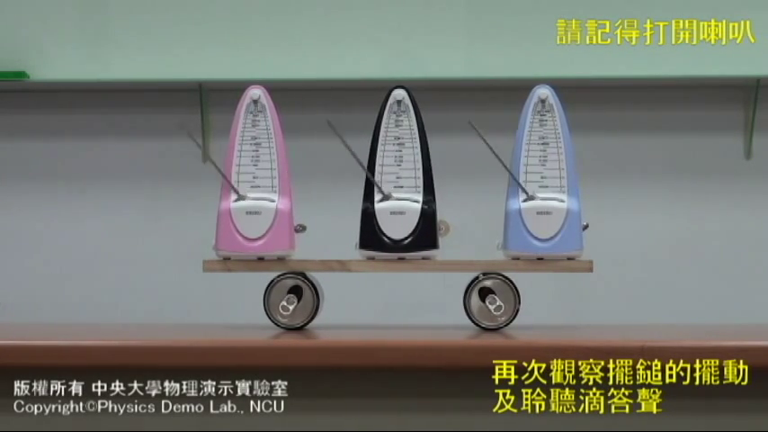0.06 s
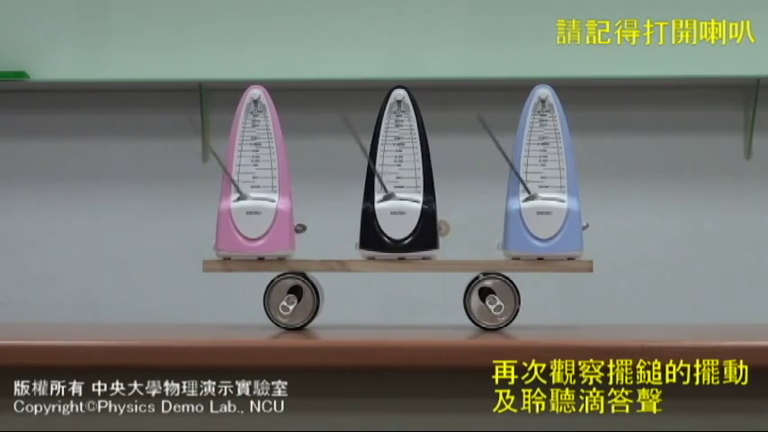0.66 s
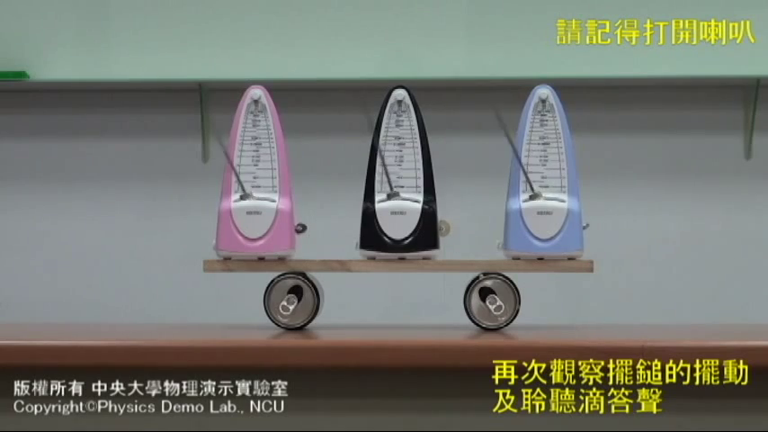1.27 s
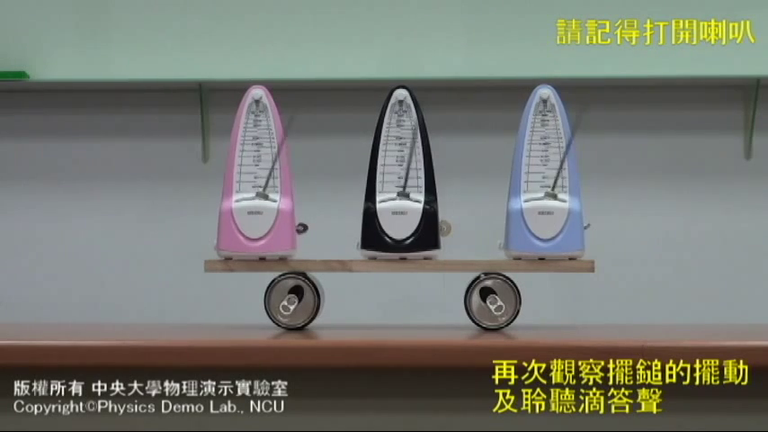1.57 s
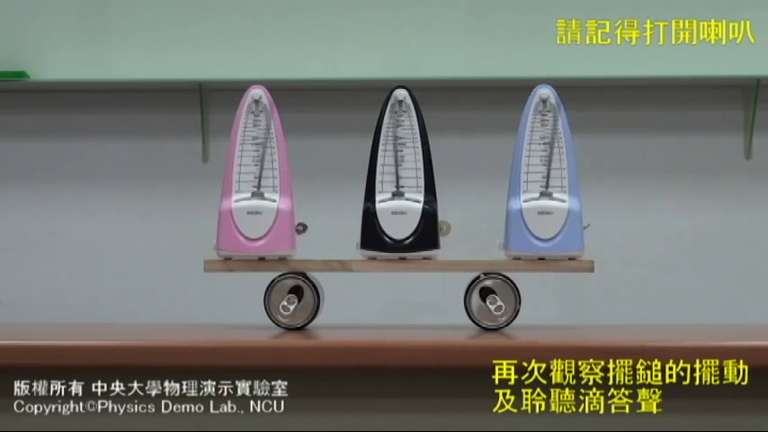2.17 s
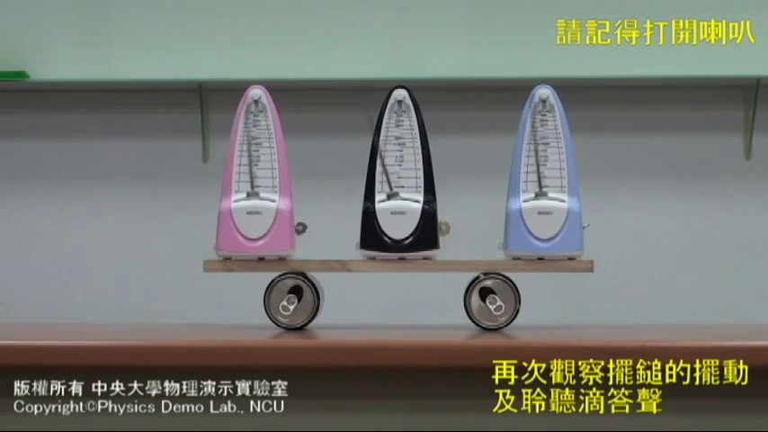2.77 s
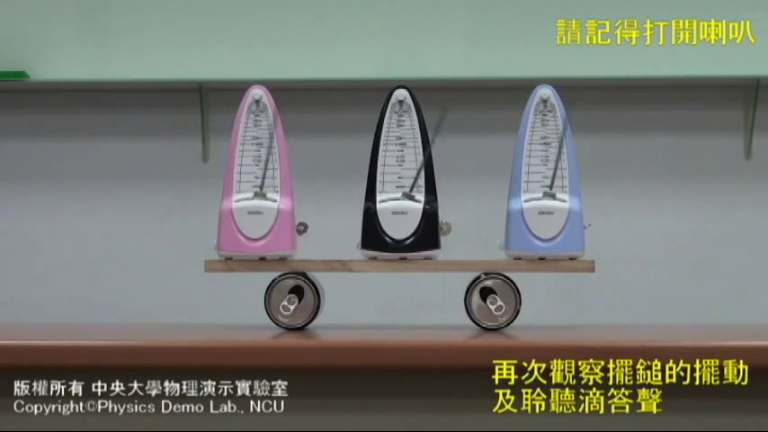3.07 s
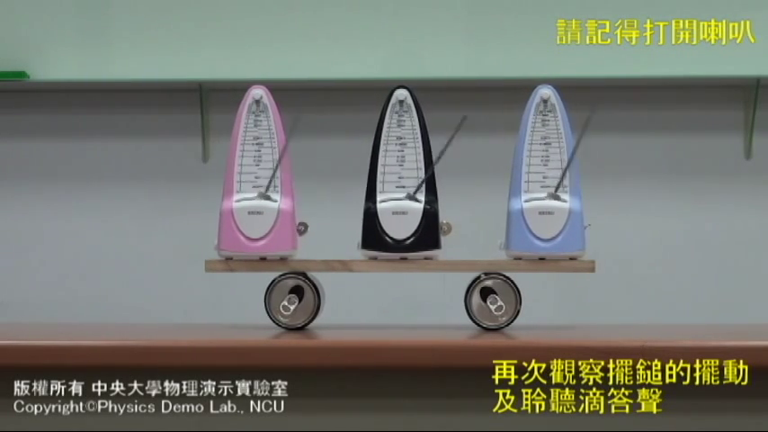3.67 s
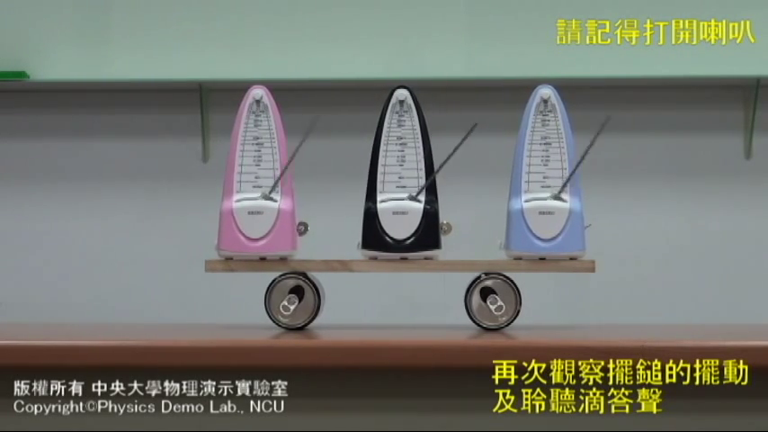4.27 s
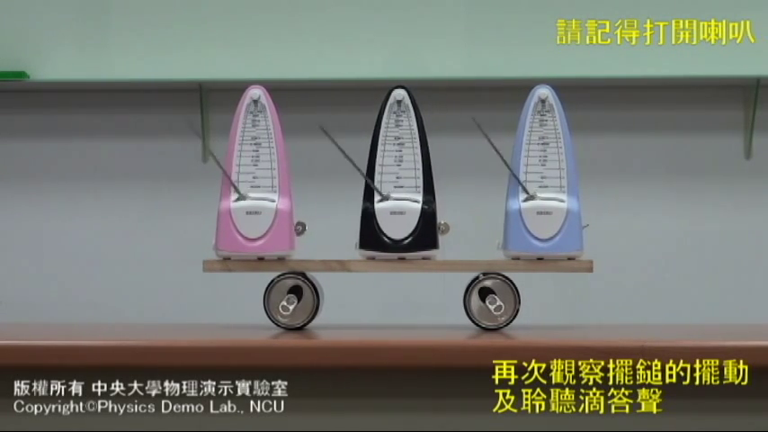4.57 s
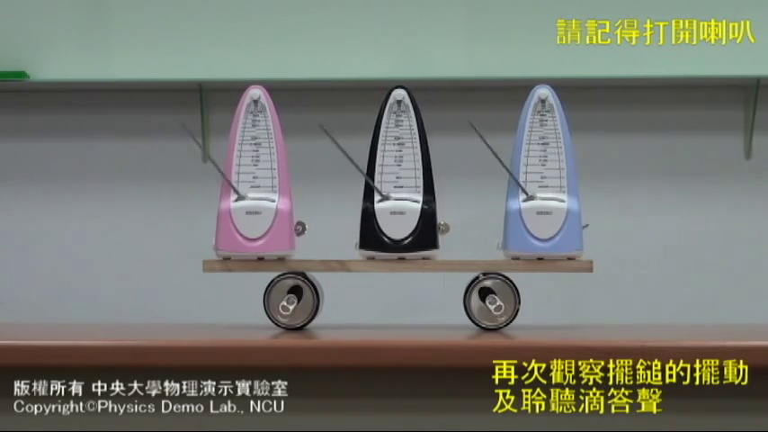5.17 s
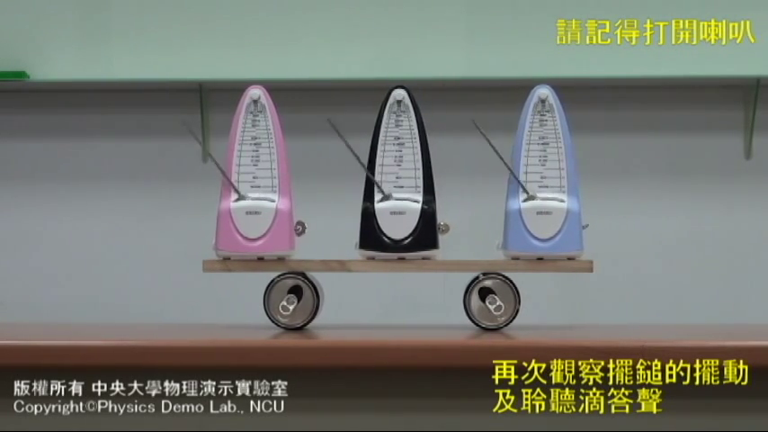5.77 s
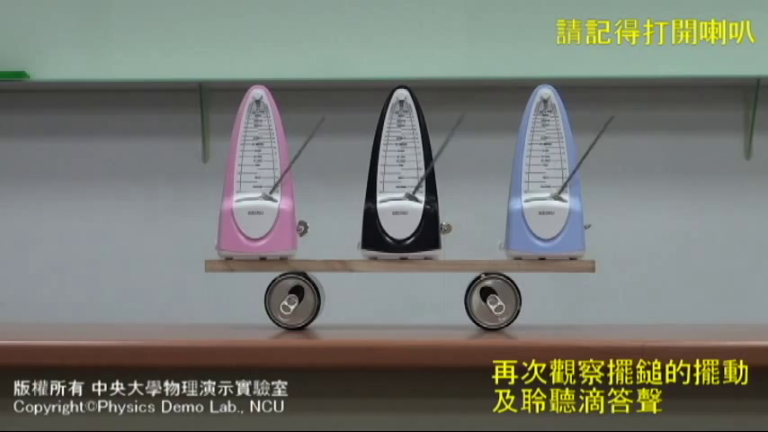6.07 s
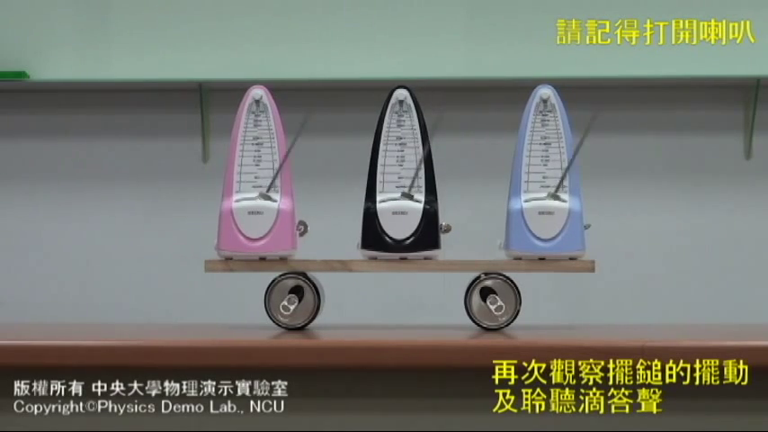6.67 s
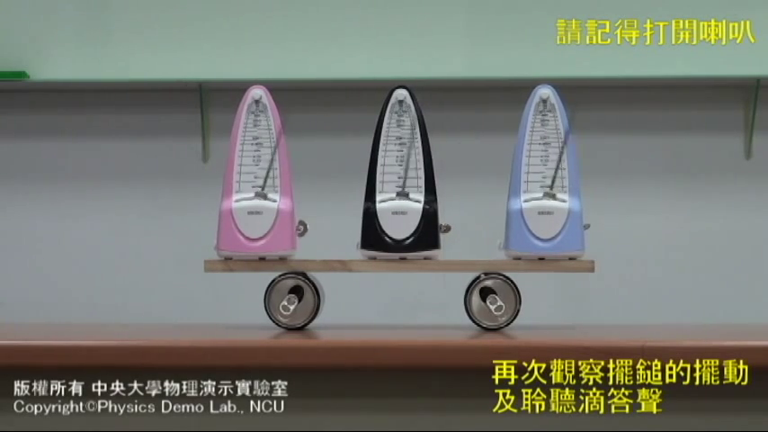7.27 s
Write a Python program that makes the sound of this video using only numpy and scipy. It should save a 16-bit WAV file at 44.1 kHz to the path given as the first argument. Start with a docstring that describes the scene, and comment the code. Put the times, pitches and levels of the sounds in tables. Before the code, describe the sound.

In a room with a quiet ventilation hum, three mechanical metronomes click away almost in step from start to finish, at roughly 210 beats a minute. Each has a slightly different plastic tone, and their ticks fall so close together that they make one crisp, thickened clack. They are heard from nearby, a little stronger on the right, with a short reverberation after each beat.

```python
"""Three metronomes on a rolling board

Three wind-up plastic metronomes tick almost in step, about 210 times a minute; one leads and two
follow some 20-30 ms later. Each escapement blow is an impact that cracks and rings its own case.
Nearby surfaces reflect the ticks, which die away in a room with a low ventilation rumble."""
import sys
import numpy as np
from scipy import signal
from scipy.fft import rfft, irfft, next_fast_len
from scipy.io import wavfile
from scipy.ndimage import uniform_filter1d

SR = 44100
rng = np.random.default_rng(int(sys.argv[2]) if len(sys.argv) > 2 else 0)


def unload_wav(signal):
    """Save mono or channel-first audio to the path in sys.argv[1] as 16-bit WAV at rate SR, clipped to [-1, 1]."""
    wavfile.write(
        sys.argv[1],
        SR,
        np.round(np.clip(np.atleast_2d(signal).T, -1, 1) * 32767).astype(np.int16),
    )


N = 322371

# Spectrum of the ventilation rumble and hiss: frequency_hz, density_db_per_hz
AIR_SPECTRUM = [(20, -80), (62, -82), (85, -75.5), (110, -66), (133, -75.5), (155, -69), (195, -67.5),
                (310, -74.5), (500, -74), (1000, -83), (4000, -86.5), (15000, -99)]
# Pendulums, one row a metronome: start_s, beat_s, lengthening_per_swing_s
PENDULUM_TIMING = [(.0202, .284205, .0000486), (.0381, .285779, -.0000378), (.0470, .284841, 0)]
# Normal modes of each case: pitch_hz, relative_peak_db, t60_s
CASE_MODES_1 = [(420, 4, 0.082), (856, 13, 0.041), (1255, 18.5, 0.022), (1661, 28.5, 0.037),
                (2075, 29, 0.033), (2893, 22.5, 0.023), (4338, 22.5, 0.037), (4856, 22.5, 0.04),
                (5000, 23, 0.044), (5300, 22, 0.053), (5544, 23.5, 0.035), (5645, 23.5, 0.054),
                (6050, 22, 0.047), (6670, 18.5, 0.046), (6770, 21.8, 0.076), (7120, 14.5, 0.056),
                (7900, 6, 0.077), (8100, 9, 0.045), (8780, 26.5, 0.038), (8949, 26, 0.034)]
CASE_MODES_2 = [(429, 3.8, 0.13), (803, 8.9, 0.041), (1350, 21.3, 0.019), (1387, 24.4, 0.066),
                (1736, 16, 0.072), (1870, 17.3, 0.052), (2136, 24.4, 0.047), (2817, 25.4, 0.064),
                (4820, 16, 0.053), (5320, 23.6, 0.028), (5436, 26, 0.038), (6120, 19, 0.047),
                (6676, 28.3, 0.026), (7070, 22, 0.038), (7470, 20, 0.052), (7668, 25.6, 0.026),
                (8300, 17, 0.044), (9080, 20, 0.044), (10058, 12, 0.043), (12130, 30.7, 0.035),
                (13300, 20, 0.045)]
CASE_MODES_3 = [(469, 9.6, 0.1), (790, 10.4, 0.079), (1378, 26.23, 0.014), (1474, 29.5, 0.057),
                (1884, 13, 0.085), (2125, 22.6, 0.044), (2320, 20.2, 0.057), (2580, 15.4, 0.04),
                (2947, 23.7, 0.056), (3660, 22.5, 0.014), (3700, 20, 0.066), (4140, 10.5, 0.058),
                (4700, 19, 0.052), (5414, 25.8, 0.03), (5660, 14, 0.047), (6030, 17, 0.04),
                (6335, 22, 0.04), (6464, 23.7, 0.031), (8740, 13, 0.049), (9560, 17, 0.033),
                (11500, 15.1, 0.042), (11900, 11, 0.05)]
# Spectrum of the crack, the dense short-lived modes of each case: frequency_hz, relative_level_db
CRACK_SPECTRUM_1 = [(250, -9), (420, 5.5), (650, 2), (850, 7), (1080, -4.5), (1270, 19), (1850, 15),
                    (2200, 21.5), (2600, 15), (6000, 20), (9500, 19), (12800, 14.5), (13900, 1),
                    (16000, -5)]
CRACK_SPECTRUM_2 = [(250, -9.5), (420, 6.5), (650, 1.5), (850, 11), (1080, -1.5), (1290, 19.5),
                    (2500, 17.5), (3300, 14.5), (6000, 18.5), (9500, 20.5), (12800, 21.5), (13900, 8),
                    (16000, -8)]
CRACK_SPECTRUM_3 = [(250, -11), (420, 8), (620, 3.5), (800, 8.5), (1100, 2.5), (1340, 21.5), (1600, 16.5),
                    (2500, 18), (3200, 14), (6300, 19), (12800, 19), (13900, 7), (16000, -7)]
# Early reflections from each metronome's place: delay_s, relative_level_db
REFLECTIONS_1 = [(.0077, 1), (.0121, -2), (.0152, -8.5), (.0245, -7.5), (.045, -11.5)]
REFLECTIONS_2 = [(.0074, 2), (.0125, 0.5), (.0231, -10.5), (.0256, -7), (.0415, -14)]
REFLECTIONS_3 = [(.0073, -4), (.0118, -6), (.0158, -9.5), (.0255, -11), (.045, -9)]
# Colour and decay of the room's reflected sound: frequency_hz, gain_db, t60_s
ROOM_BANDS = [(300, 3, 0.73), (810, 2.5, 0.61), (1200, -4, 0.45), (1750, -1, 0.45), (2330, 1, 0.47),
              (3450, 0, 0.42), (6080, 1, .48), (8970, -2.5, 0.39), (14100, -3.5, .33)]
# Left microphone relative to the right: frequency_hz, gain_db, phase_lead_rad
LEFT_PORT = [(60, -3, 0.22), (110, -6.5, 0.45), (200, -15, 0.73), (380, -11, 1.26), (710, -6.5, 1.4),
             (1250, -5.5, 0.87), (2400, -3.5, 0.91), (3520, -4.5, 0.49), (6800, -6.5, 0.48),
             (10500, -1, 0.88), (12600, -8.5, 0.18)]


def undb(db):
    """Amplitude ratio of a level in decibels."""
    return 10 ** (np.asarray(db) / 20)


def along(table, hz, column=1):
    """Interpolation of a table column on a log-frequency axis."""
    table = np.array(table)
    return np.interp(np.log(hz + 1), np.log(table[:, 0]), table[:, column])


def fade(t, t60):
    """Exponential damping: 60 dB are lost in t60 seconds."""
    return np.exp(-np.log(1000) * t / t60)


def unit(x):
    """Normalisation to unit energy."""
    return x / np.sqrt(np.sum(x ** 2, axis=-1, keepdims=True))


def colour(table, size=2048):
    """Minimum-phase impulse response of a spectrum, by folding its cepstrum."""
    cepstrum = irfft(np.log(undb(along(table, np.fft.rfftfreq(size, 1 / SR)))))
    cepstrum[1:size // 2] *= 2
    cepstrum[size // 2 + 1:] = 0
    return irfft(np.exp(rfft(cepstrum)))


def whiten(burst, bins=75):
    """Spectral whitening: dividing by the smoothed spectrum levels out its broad humps."""
    spectrum = rfft(burst)
    return irfft(spectrum / np.sqrt(uniform_filter1d(np.abs(spectrum) ** 2, bins)))


def coherent_pair(noise, shared):
    """Partial coherence: two channels draw a share of their power from a third, common noise."""
    return np.sqrt(shared) * noise[2] + np.sqrt(1 - shared) * noise[:2]


def ventilation(bass_coherence=.75, hum_hz=109.3, hum_width_hz=5, hum_db=-55):
    """Broadband noise gives rumble and hiss; the fan hum wavers because it is narrowband noise."""
    hz = np.fft.rfftfreq(N, 1 / SR)
    noise = rfft(rng.standard_normal((4, N)))
    shared = bass_coherence / (1 + hz / 700)
    air = coherent_pair(noise, shared) * undb(along(AIR_SPECTRUM, hz)) * np.sqrt(SR / 2)
    hum = irfft(noise[3] / (1 + ((hz - hum_hz) / hum_width_hz) ** 2), N)
    return irfft(air, N) + undb(hum_db) * np.sqrt(N) * unit(hum)


def pendulum(start_s, beat_s, drift_s, count=26):
    """Tick times, one a swing. A set drift of the beat stands for entrainment by the shared board."""
    swing = np.arange(count)
    return start_s + beat_s * swing + drift_s * swing * (swing - 1) / 2


def metronome(times, case, crack, ring_db, crack_db, crack_t60, slide_db, size=8192):
    """Impact excitation: each escapement blow rings the case's damped modes and adds a noisy crack."""
    fresh_grain, mode_spread_db, force_spread_db = 0.73, 1.5, 0.31  # variation from tick to tick
    t = np.arange(size) / SR
    hz, peak_db, t60 = np.transpose(case)[:, :, None]
    amplitude = undb(peak_db) * 2 * np.log(1000) / (t60 * SR)  # resonance peak times damping
    modes = amplitude * np.sin(2 * np.pi * hz * t) * fade(t, t60)
    modes[::2] *= -1  # neighbouring modes start in opposite phase
    shell = colour(crack)
    own_grain = rng.standard_normal(size)
    envelope = .7 * fade(t, .008) + fade(t, crack_t60)  # hard snap, then the shell's short rattle
    lead = int(.003 * SR)
    ticks = np.zeros(N + 2 * size)
    for start_s in times:
        grain = own_grain + fresh_grain * rng.standard_normal(size)
        burst = whiten(envelope * grain)[:size // 2]
        rattle = undb(crack_db) * signal.fftconvolve(unit(burst), shell)
        tick = undb(ring_db + mode_spread_db * rng.standard_normal(len(hz))) @ modes
        tick[:len(rattle)] += rattle
        start = int(start_s * SR)
        ticks[start:start + size] += undb(force_spread_db * rng.standard_normal()) * tick
        # the tooth slides along the pallet just before it drops
        slide = undb(slide_db) * np.convolve(unit(rng.standard_normal(lead)), shell)
        ticks[start - lead:start - lead + len(slide)] += slide
    # so small a case radiates no deep bass
    high_pass = signal.butter(2, 170, "highpass", fs=SR, output="sos")
    return signal.sosfilt(high_pass, ticks[:N])


def room(source, reflections, tail_db, scatter_db=-6, scatter_t60=0.033, build_s=0.013, size=32768):
    """Reverberation: direct sound, specular reflections with scatter behind them, and a diffuse tail."""
    t = np.arange(size) / SR
    early = np.zeros(size)
    for delay_s, level_db in reflections:
        bounce = undb(scatter_db) * unit(rng.standard_normal(size) * fade(t, scatter_t60))
        bounce[0] += 1  # specular part
        start = int(delay_s * SR)
        early[start:] += undb(level_db) * bounce[:size - start]
    noise = coherent_pair(rfft(rng.standard_normal((3, size))), shared=0.39)
    log_hz = np.log(np.fft.rfftfreq(size, 1 / SR) + 1)
    centres_hz, _, t60s = np.transpose(ROOM_BANDS)
    tail = np.zeros((2, size))
    for weights, t60 in zip(np.eye(len(t60s)), t60s):
        band = np.interp(log_hz, np.log(centres_hz), weights)
        tail += irfft(noise * band) * fade(t, t60)
    build_up = 1 - np.exp(-(t / build_s) ** 2)
    tail = undb(tail_db) * unit(tail * build_up)
    # the surfaces absorb treble, so only the direct sound keeps its full edge
    response = signal.fftconvolve(early + tail, colour(ROOM_BANDS)[None], axes=1)
    response[:, 0] += 1  # direct sound
    return signal.fftconvolve(source[None], response, axes=1)[:, :N]


def scene():
    """Superposition of the ventilation and three metronomes, each from its own place in the room."""
    times_1, times_2, times_3 = (pendulum(*timing) for timing in PENDULUM_TIMING)
    first = metronome(times_1, CASE_MODES_1, CRACK_SPECTRUM_1,
                      ring_db=-6, crack_db=-6.5, crack_t60=0.026, slide_db=-30)
    second = metronome(times_2, CASE_MODES_2, CRACK_SPECTRUM_2,
                       ring_db=-8.5, crack_db=-8.5, crack_t60=0.026, slide_db=-39)
    third = metronome(times_3, CASE_MODES_3, CRACK_SPECTRUM_3,
                      ring_db=-5, crack_db=-6, crack_t60=0.035, slide_db=-37)
    return (room(first, REFLECTIONS_1, tail_db=1)
            + room(second, REFLECTIONS_2, tail_db=3.5)
            + room(third, REFLECTIONS_3, tail_db=2)
            + ventilation())


def record(dry):
    """Two close microphone ports, the left quieter and leading in phase; saturation, then a low-pass."""
    ceiling, cutoff_hz = .95, 15700
    size = next_fast_len(N + SR)
    hz = np.fft.rfftfreq(size, 1 / SR)
    port = undb(along(LEFT_PORT, hz)) * np.exp(1j * along(LEFT_PORT, hz, column=2))
    left = irfft(rfft(dry[0], size) * port, size)[:N]
    pair = np.array([left, dry[1]])
    rounded = pair / (1 + (pair / ceiling) ** 10) ** (1 / 10)
    low_pass = signal.ellip(8, .2, 70, cutoff_hz, fs=SR, output="sos")
    return signal.sosfilt(low_pass, rounded)


dry = scene()
out = record(dry)
unload_wav(out)
```